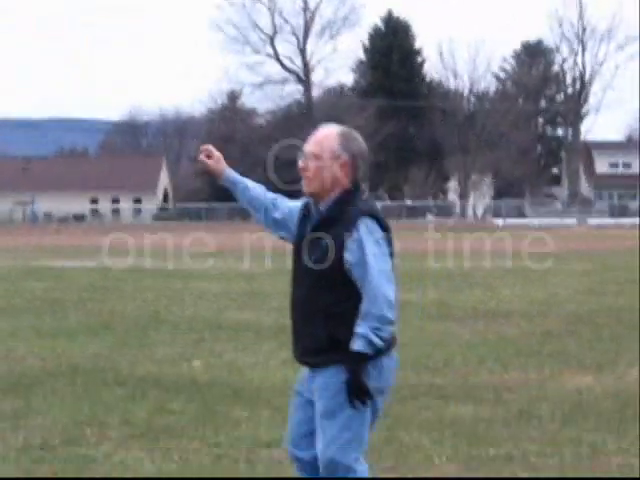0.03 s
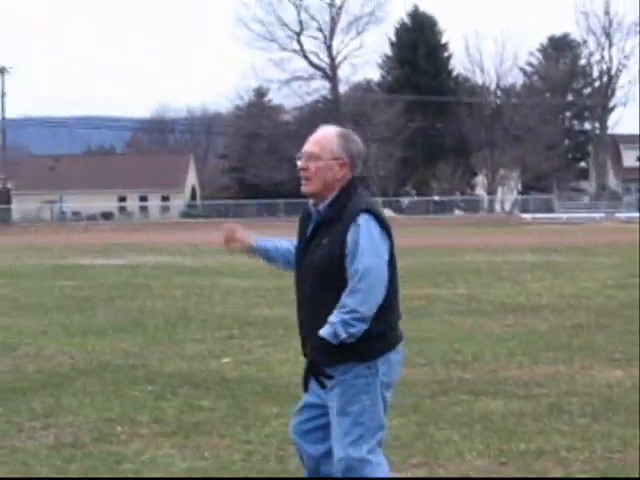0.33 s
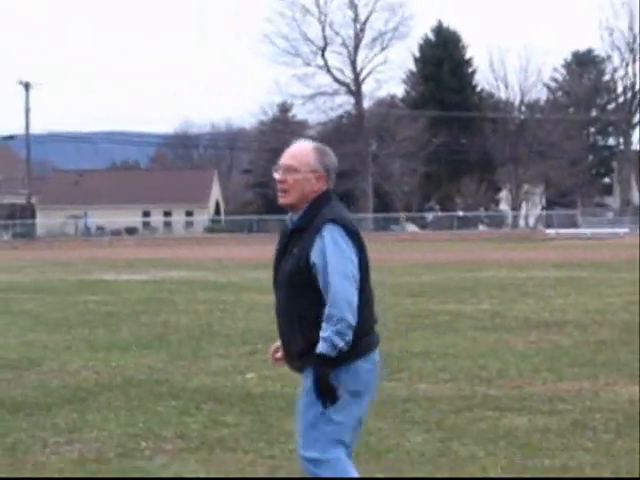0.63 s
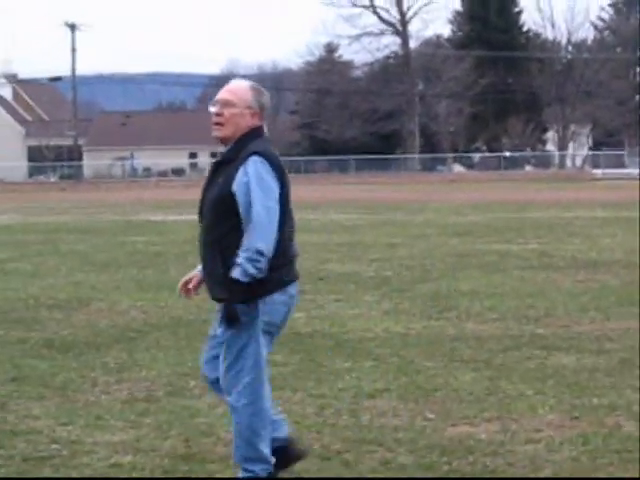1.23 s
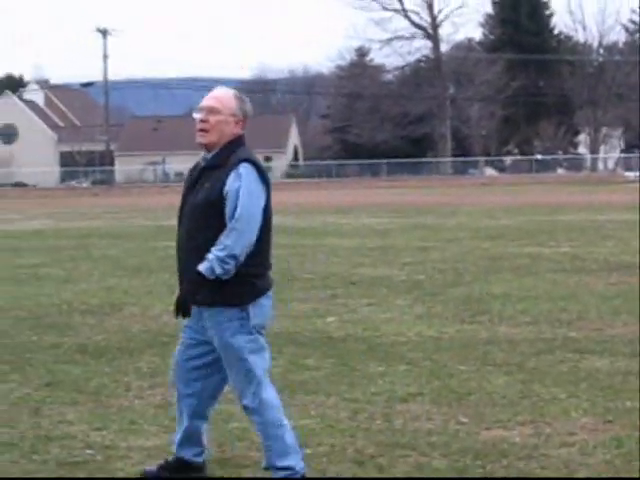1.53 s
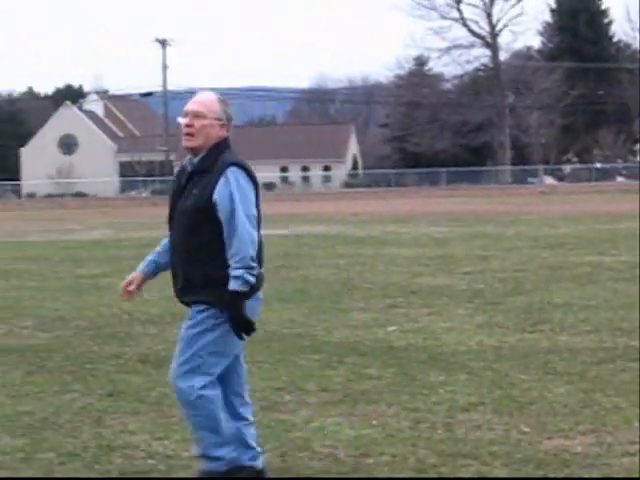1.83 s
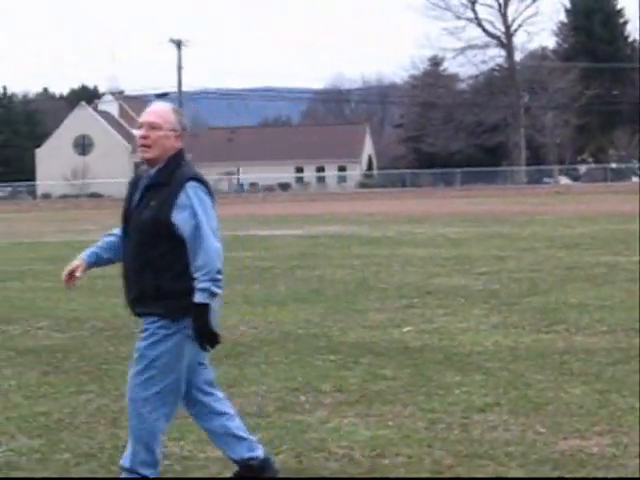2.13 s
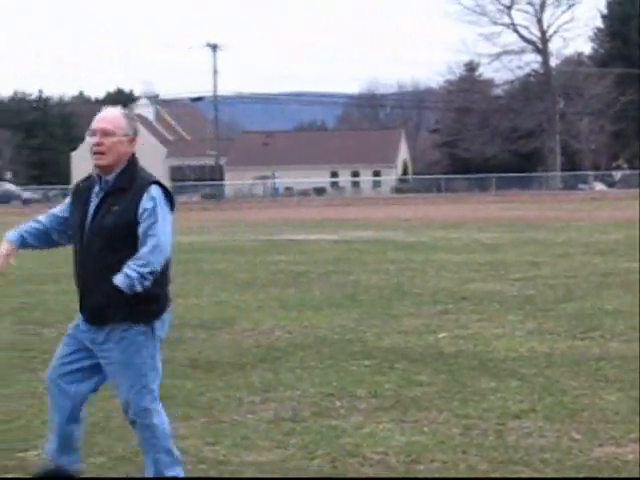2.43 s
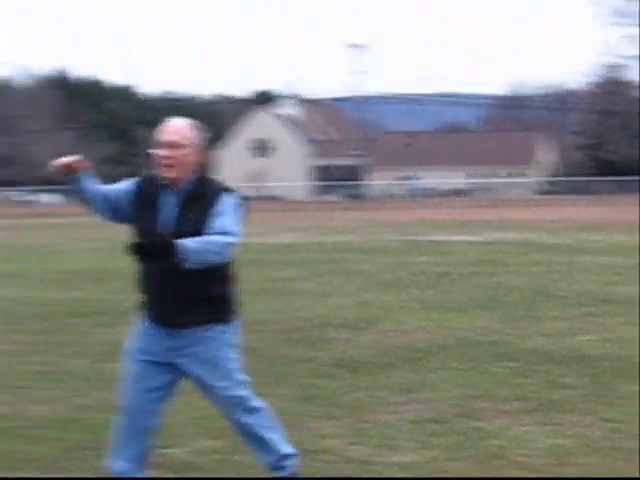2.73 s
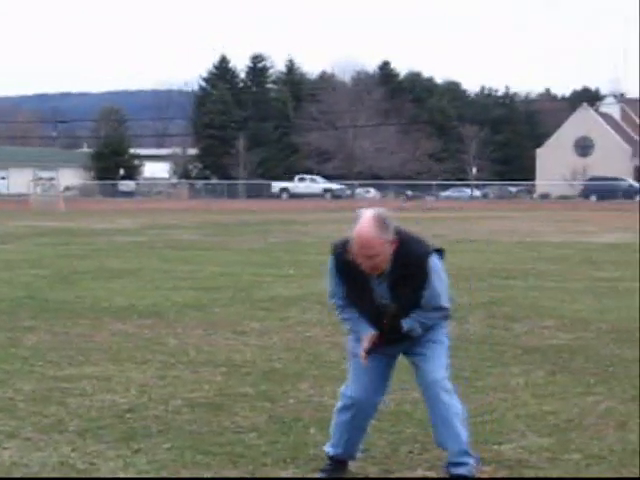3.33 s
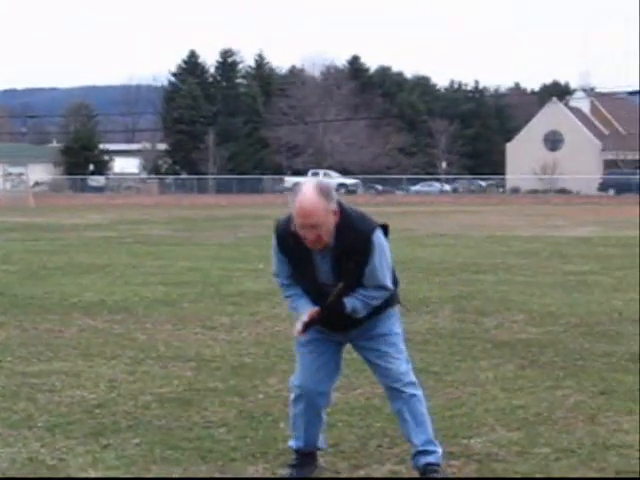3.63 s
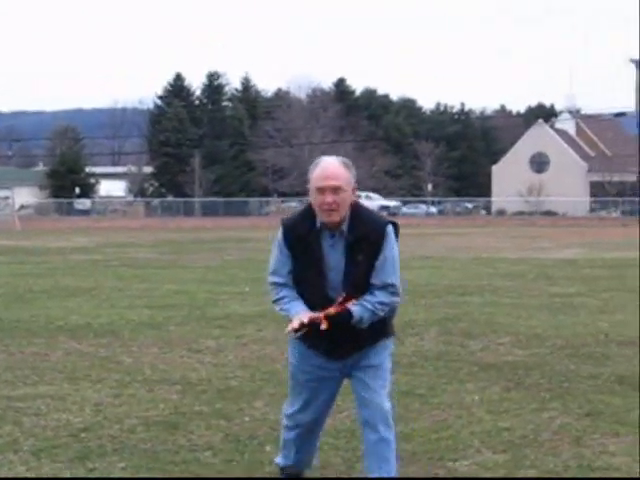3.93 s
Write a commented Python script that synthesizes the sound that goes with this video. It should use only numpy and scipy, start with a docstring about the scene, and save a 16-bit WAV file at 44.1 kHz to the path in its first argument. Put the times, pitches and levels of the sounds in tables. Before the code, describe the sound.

Wind rumbles and hisses on the microphone in an open field, over the tyre wash and engine drone of a distant road. A few faint steps brush the grass, and near the end hands slap shut on a wooden boomerang.

```python
"""An open grassy field. From the start, wind rumbles and hisses over the tyre wash of a distant road,
where an engine drones and slowly sinks in pitch, beside a rougher vehicle and a faint hum.
From 0.8 s a man steps through the grass; at 3.3 s he claps a light wooden boomerang between his hands.
A slow sample-and-hold mirrors all this into a thin fizz, and the sound stops shortly before the end."""
import sys
import numpy as np
from scipy.fft import rfft, irfft, next_fast_len
from scipy.io import wavfile
from scipy.ndimage import map_coordinates

SR = 44100
rng = np.random.default_rng(int(sys.argv[2]) if len(sys.argv) > 2 else 0)


def file_out(sig):
    """Save sig as 16-bit WAV at sys.argv[1]."""
    # one column per channel
    cols = np.atleast_2d(sig).T
    # limit, then scale
    lim = np.clip(cols, -1, 1)
    pcm = np.round(lim * 32767).astype(np.int16)
    wavfile.write(sys.argv[1], SR, pcm)


N = 176400
TIME_S = np.arange(N) / SR
HOLD_SAMPLES = 4


def amp(db):
    """Amplitude ratio: tenfold for every 20 dB."""
    return 10 ** (np.asarray(db) / 20)


def unit_rms(x):
    """Normalisation to an rms of 1."""
    return x / np.sqrt(np.mean(x ** 2) + 1e-20)


def curves(rows):
    """Linear interpolation in time of each column after the first."""
    time_s, *columns = np.transpose(rows)
    return [np.interp(TIME_S, time_s, column) for column in columns]


def wobble(rate_hz):
    """Slow random modulation: a spline through Gaussian knots."""
    return map_coordinates(rng.standard_normal(400), [TIME_S * rate_hz + 2], mode="wrap")


def filtered(x, response):
    """Linear filtering: the spectrum is multiplied by a frequency response."""
    size = next_fast_len(N + 8192)
    return irfft(rfft(x, size) * response(np.fft.rfftfreq(size, 1 / SR)), size)[:N]


def noise(spectrum):
    """Spectral shaping of white noise, to rms 1, below the sample-and-hold's Nyquist frequency."""
    points_hz, points_db = np.transpose(spectrum)

    def colour(hz):
        gain_db = np.interp(np.log(hz + 1), np.log(points_hz + 1), points_db)
        return amp(gain_db) * (hz < SR / HOLD_SAMPLES / 2)
    return unit_rms(filtered(rng.standard_normal(N), colour))


def narrowband(centre_hz, width_hz):
    """Quadrature modulation: two slow noises on a carrier form a band of rms 1."""
    phase = 2 * np.pi * np.cumsum(centre_hz * np.ones(N)) / SR
    lowpass = lambda hz: 1 / (1 + (2 * hz / width_hz) ** 2)
    in_phase, quadrature = (filtered(rng.standard_normal(N), lowpass) for _ in range(2))
    return unit_rms(in_phase * np.cos(phase) + quadrature * np.sin(phase))


def swell(peak_s, level_db, sigma_s):
    """A Gaussian envelope."""
    return amp(level_db) * np.exp(-.5 * ((TIME_S - peak_s) / sigma_s) ** 2)


def impact(start_s, level_db, t60_s, attack_s=.00045):
    """Damping: a contact's envelope rises fast, then decays exponentially."""
    age_s = np.maximum(TIME_S - start_s, 0)
    return amp(level_db - 60 * age_s / t60_s) * (1 - np.exp(-age_s / attack_s))


# strength of the rumble: time_s, level_db
RUMBLE_LEVELS = [(0, -28.5), (.9, -27.5), (1.8, -28), (2.15, -28), (2.6, -32), (3.05, -27.5), (3.4, -29.5),
                 (3.75, -29.5)]
# its spectrum: frequency_hz, density_db
RUMBLE_SPECTRUM = [(8, -25.5), (20, -1.5), (50, -3.5), (66, 2.5), (82, 3), (100, -4), (180, -2), (240, -7),
                   (300, -13), (450, -20), (800, -26), (2000, -57.5)]
def wind_rumble():
    """Turbulence: low-frequency noise whose level wavers at random."""
    level_db, = curves(RUMBLE_LEVELS)
    return amp(level_db + .5 * wobble(14)) * noise(RUMBLE_SPECTRUM)


# strength of the hiss and of its hollow middle band: time_s, hiss_db, hollow_db
HISS_LEVELS = [(0, -35, -39.5), (.6, -36, -44), (1.2, -37, -39), (1.8, -37.5, -43), (2.4, -36, -42),
               (3.2, -38, -41), (3.5, -38, -42.5), (3.62, -40.5, -38.5), (3.75, -42.5, -37)]
# their spectra: frequency_hz, density_db
HISS_SPECTRUM = [(300, -7), (1000, -4.5), (1500, -1.5), (2000, -3), (2700, -4), (3400, -9.5), (4200, -16.5),
                 (5400, -26.5)]
HOLLOW_SPECTRUM = [(800, -28.5), (1250, -5.5), (1500, -2), (1900, -3.5), (2300, -10), (3200, -27)]
def wind_hiss():
    """Broadband flow noise, turning hollow at the end as its middle band dominates."""
    hiss_db, hollow_db = curves(HISS_LEVELS)
    flutter = amp(.3 * wobble(8.5))
    return flutter * (amp(hiss_db) * noise(HISS_SPECTRUM) + amp(hollow_db) * noise(HOLLOW_SPECTRUM))


# wash of the road: time_s, level_db, resonance_hz
ROAD_WASH = [(0, -30.5, 870), (.35, -30, 900), (.53, -28, 870), (.66, -30, 870), (.78, -28.5, 870),
             (1.1, -32, 900), (1.6, -30.5, 970), (2.1, -32, 990), (2.5, -35, 990), (3.1, -33, 980),
             (3.75, -33.5, 990)]
# tyre spectrum: frequency_hz, density_db
TYRE_SPECTRUM = [(100, -18), (300, -4.5), (500, -6.5), (700, -5), (1000, -3), (1300, -10.5), (2000, -18),
                 (4000, -38.5)]
def road():
    """Rolling noise of far tyres: a broad wash with one drifting resonance."""
    level_db, resonance_hz = curves(ROAD_WASH)
    wash = unit_rms(noise(TYRE_SPECTRUM) + amp(-6) * narrowband(resonance_hz, width_hz=310))
    return amp(level_db + .8 * wobble(18)) * wash


# running of the distant engine: time_s, firing_hz, level_db, brightness_db
ENGINE_RUN = [(0, 76, -35.5, 0.5), (.3, 72.05, -34, 2.5), (.65, 71.45, -29, -4), (1.25, 70.7, -30, -1.5),
              (1.6, 70.92, -36, 2.5), (2.05, 70.07, -38.5, 5.5), (2.35, 69.45, -33.5, -3.5),
              (2.8, 69, -29, -5.5), (3.15, 67.3, -37, 1.5), (3.45, 64.44, -30.5, -6), (3.75, 65, -36.5, -6)]
# exhaust tones: harmonic_number, relative_db
EXHAUST_HARMONICS = [(1, -8), (2, -1.5), (3, -9.5), (4, -9.5), (5, -14.5), (6, -16.5)]
# exhaust noise: frequency_hz, density_db
ROAR_SPECTRUM = [(120, -22.5), (200, 3), (280, 4.5), (380, 1), (520, -9), (900, -24.5)]
def engine():
    """Periodic firing gives a harmonic series over a roar; each harmonic fades in the moving air."""
    firing_hz, level_db, brightness_db = curves(ENGINE_RUN)
    phase = 2 * np.pi * np.cumsum(firing_hz * (1 + .002 * wobble(13))) / SR
    exhaust = amp(brightness_db - 5.5) * noise(ROAR_SPECTRUM)
    for harmonic, relative_db in EXHAUST_HARMONICS:
        fading_db = 1.25 if harmonic == 2 else 2.5  # the strongest is the steadiest
        rms = amp(relative_db + brightness_db * (harmonic > 2) + fading_db * wobble(5))
        exhaust += np.sqrt(2) * rms * np.sin(harmonic * phase + rng.uniform(0, 2 * np.pi))
    return amp(level_db) * exhaust


# drone of the second vehicle: time_s, pitch_hz, level_db
VEHICLE_DRONE = [(0, 123.5, -48), (.9, 122, -40), (1.15, 122.7, -37.5), (1.9, 124, -32), (2.12, 124.4, -49),
                 (2.4, 120.3, -27.5), (2.6, 119.7, -47.5), (3.08, 116.5, -26), (3.35, 118, -40.5),
                 (3.75, 118, -44)]
def rough_vehicle():
    """Beating within a narrow noise band roughens a drone that swells and fades."""
    pitch_hz, level_db = curves(VEHICLE_DRONE)
    return amp(level_db) * narrowband(pitch_hz, width_hz=5.9)


def hum():
    """A very narrow noise band is heard as a faint, steady pitch."""
    return amp(-51.5) * narrowband(560, width_hz=1.4)


# gusts: peak_s, level_db, sigma_s, centre_hz
GUSTS = [(0.143, -24.5, 0.043, 72), (0.316, -29.5, 0.036, 90), (2.405, -25, 0.026, 130),
         (3.02, -31, .04, 70)]
def wind_buffets():
    """Brief pressure fluctuations of gusts thump in the low end."""
    return sum(swell(peak_s, level_db, sigma_s) * narrowband(centre_hz, width_hz=15)
               for peak_s, level_db, sigma_s, centre_hz in GUSTS)


# shoes brushing the grass: peak_s, level_db, sigma_s
FOOTFALLS = [(.8, -44, .02), (0.999, -42, 0.0048), (2.936, -41, .016), (3.031, -49, .05)]
# swish spectrum: frequency_hz, density_db
GRASS_SPECTRUM = [(500, -13.5), (2500, -1), (4000, -2), (5400, -8)]
def steps():
    """Friction of shoes on dry grass gives short, bright swishes."""
    return sum(swell(*footfall) for footfall in FOOTFALLS) * noise(GRASS_SPECTRUM)


# hands closing on the wood: start_s, level_db, t60_s
SLAPS = [(3.263, -32.5, .025), (3.3078, -21.5, 0.02), (3.3115, -25.5, 0.023), (3.3237, -27, 0.05),
         (3.3313, -33.5, 0.053)]
# slap spectrum: frequency_hz, density_db
SLAP_SPECTRUM = [(150, -22.5), (600, 5.5), (1000, -0.5), (1500, -4.5), (2200, -1), (3500, -7.5), (4500, -9),
                 (5400, -5)]
# hollow thuds of the palms: start_s, level_db
PALM_THUDS = [(3.311, -31), (3.331, -28)]
def boomerang_clap():
    """Impact noise: dry slaps as the hands trap the wood, over the palms' damped resonance."""
    slaps = sum(impact(*slap) for slap in SLAPS)
    thuds = sum(impact(*thud, t60_s=.066) for thud in PALM_THUDS)
    return slaps * noise(SLAP_SPECTRUM) + thuds * narrowband(817, width_hz=450)


def scene():
    """Superposition: the pressures of all sources add at one point."""
    wind = wind_rumble() + wind_hiss() + wind_buffets()
    return (wind + road() + engine() + rough_vehicle() + hum() + boomerang_clap() + steps())[None]


def record(dry):
    """A zero-order hold mirrors the spectrum into the treble; a stop and a band limit follow."""
    stop_s, cutoff_hz = 3.763, 15700
    held = np.repeat(dry[0, ::HOLD_SAMPLES], HOLD_SAMPLES)[:N]
    return filtered(held * (TIME_S < stop_s), lambda hz: hz < cutoff_hz)[None]


dry = scene()
out = record(dry)
file_out(out)
```